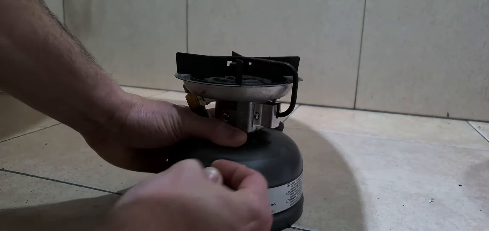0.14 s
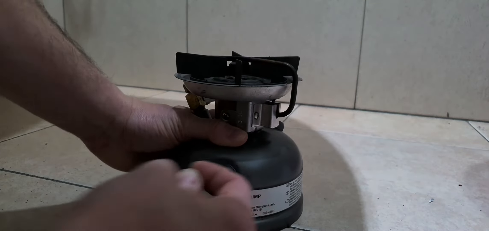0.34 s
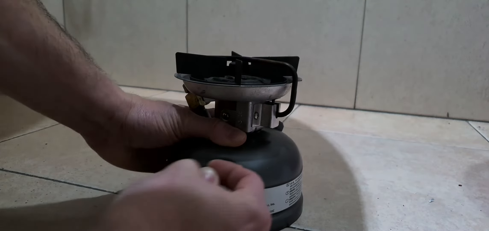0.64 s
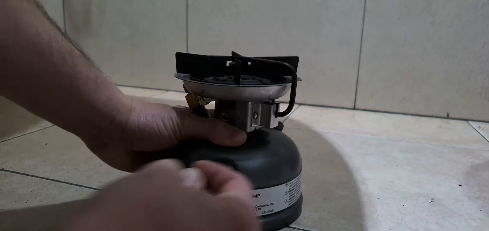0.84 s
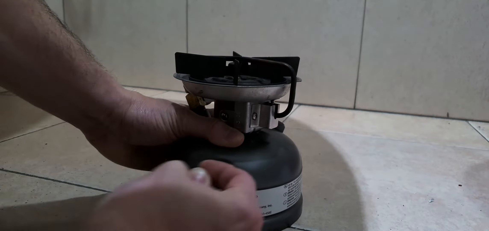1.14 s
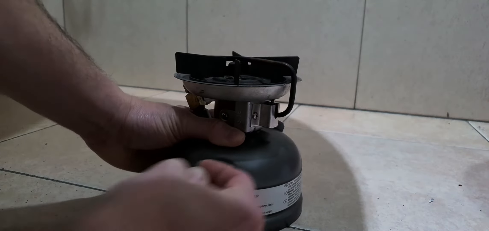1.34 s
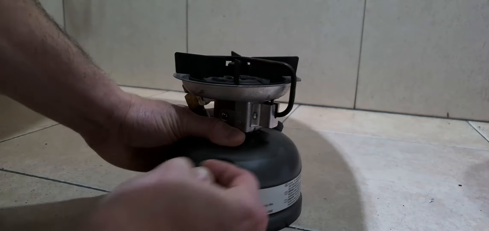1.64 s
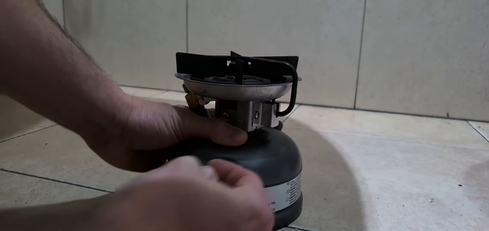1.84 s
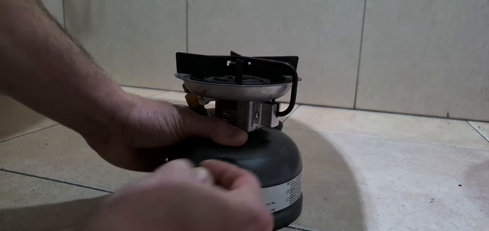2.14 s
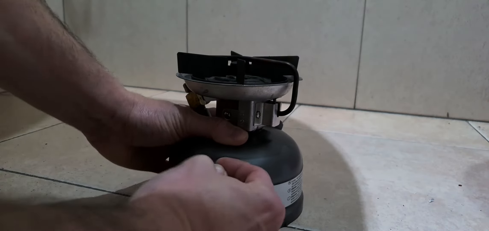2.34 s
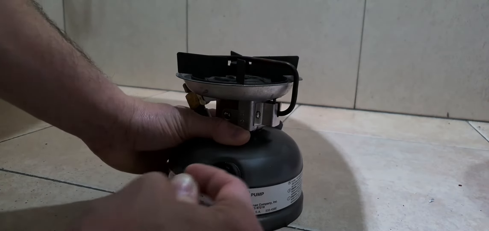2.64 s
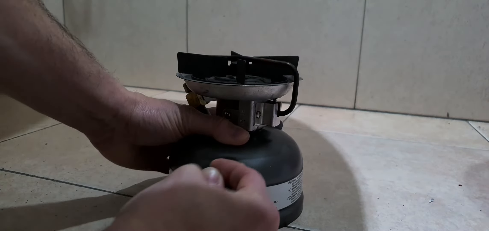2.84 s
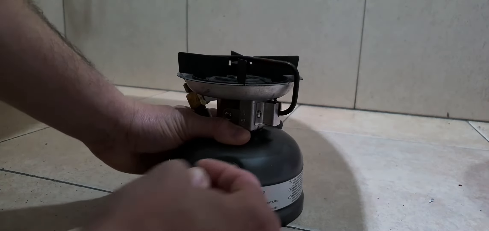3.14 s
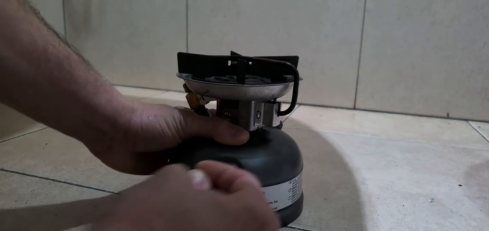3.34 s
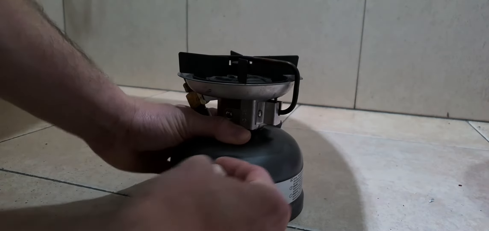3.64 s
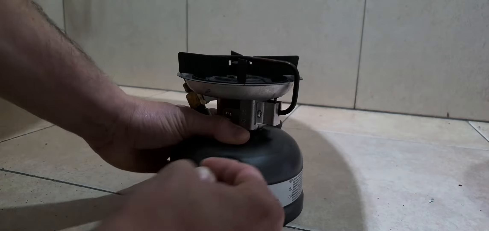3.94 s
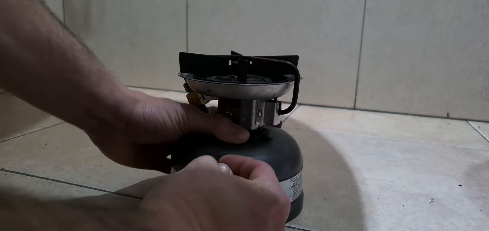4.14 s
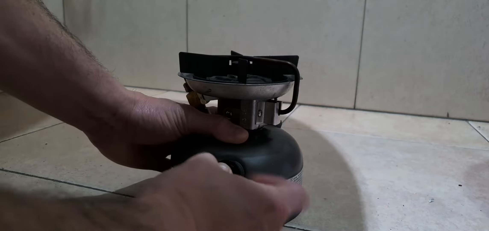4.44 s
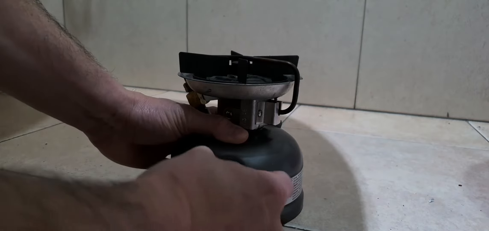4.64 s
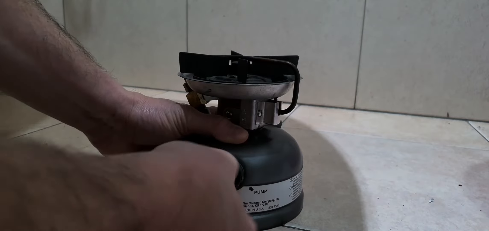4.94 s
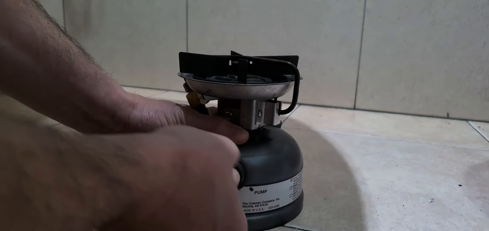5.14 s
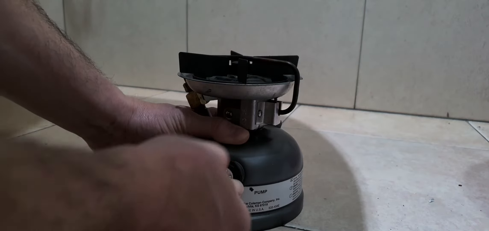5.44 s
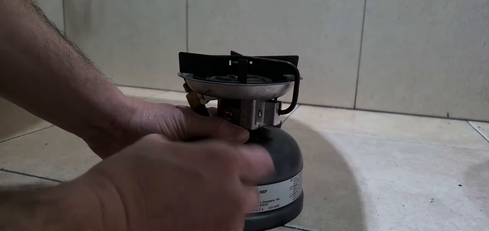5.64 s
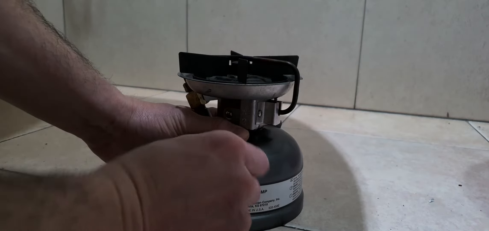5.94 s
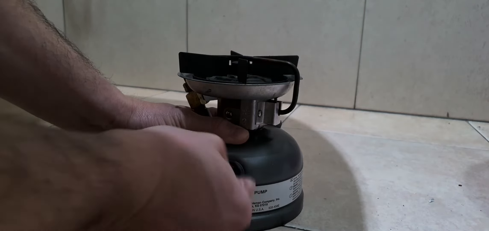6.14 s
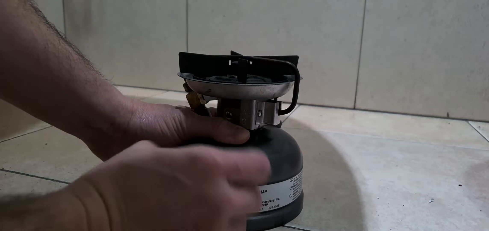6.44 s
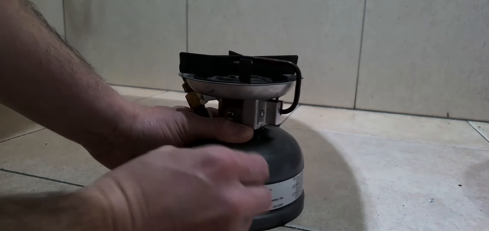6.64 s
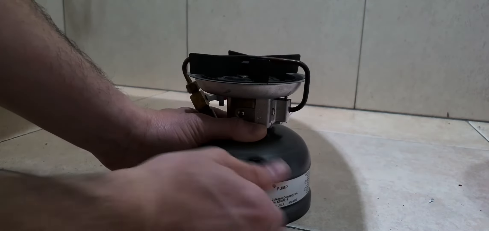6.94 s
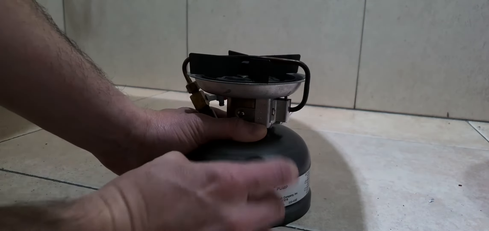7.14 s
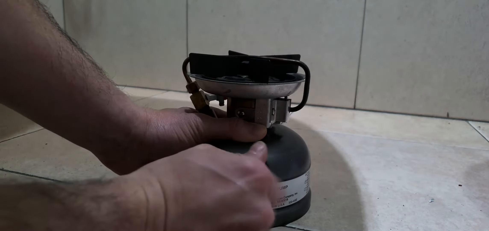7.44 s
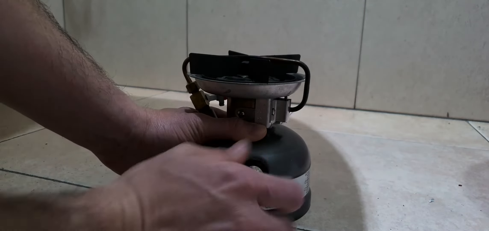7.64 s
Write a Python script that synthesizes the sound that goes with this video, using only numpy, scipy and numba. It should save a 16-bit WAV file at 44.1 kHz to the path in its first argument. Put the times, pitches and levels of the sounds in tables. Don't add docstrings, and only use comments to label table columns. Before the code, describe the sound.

Close metallic pumping on a tiled floor: gritty rod scrapes, hard clanks and rattling grate, then a short air leak, knob scrapes and final knocks.

```python
import sys
import numpy as np
from scipy import signal
from scipy.fft import rfft, irfft, next_fast_len
from scipy.io import wavfile
from scipy.ndimage import uniform_filter1d
from numba import njit

SR = 44100
rng = np.random.default_rng(int(sys.argv[2]) if len(sys.argv) > 2 else 0)


def gain_from_db(level_db):
    decades = np.asarray(level_db, float) / 20
    return 10 ** decades


def transcribe(u):
    v = np.clip(np.atleast_2d(u).T, -1, 1)
    q = np.round(v * 32767).astype(np.int16)
    wavfile.write(sys.argv[1], SR, q)


N = 343096

# start in seconds, peak in dB, brightness in dB, buzz t60 in seconds.
STROKE_ENDS = [(0.0024, -33.5, -11.5, 0.23), (0.2032, -31.5, -6, 0.23), (0.496, -30, -2.5, 0.3),
               (0.7249, -23.5, -1, 0.43), (0.9758, -26.5, -7, 0.18), (1.0047, -23, -7.5, 0.3),
               (1.2511, -24.5, -9, 0.32), (1.5367, -35.5, -13, 0.42), (1.7525, -16.5, -5.5, 0.33),
               (2.062, -21, -4, 0.19), (2.6275, -28.5, -7, 0.17), (2.9439, -15, -3.5, 0.51),
               (3.245, -24.5, -4.5, 0.51), (3.3136, -19, -4, 0.093), (3.5469, -12, -0.5, 0.45),
               (3.8248, -26, -12, 0.068), (3.8594, -27, 0.5, 0.29), (4.151, -20.5, -4, 0.49)]
# start in seconds, level in dB, swell in seconds, t60 in seconds,
# change at the top of the band in dB per octave.
RATTLES = [(0.301, -41, 0.012, 0.24, -21), (0.501, -45, 0.032, 0.43, -5), (0.727, -38.5, 0.013, 0.54, -9),
           (1.007, -48, 0.01, 0.35, -13), (1.254, -45, 0.015, 0.57, -16), (1.753, -39.5, 0.012, 0.62, -5),
           (2.065, -54.5, 0.026, 1, 2.5), (2.212, -48, 0.00057, 0.35, -5.5),
           (2.629, -48.5, 0.071, 0.38, 5.5), (2.953, -23.5, 0.0068, 0.24, 1),
           (3.316, -40.5, 0.012, 0.28, -6.5), (3.552, -19.5, 0.012, 0.26, 3),
           (3.86, -44.5, 0.026, 0.44, -15), (4.155, -26.5, 0.014, 0.28, -1), (6.872, -48, 0.0064, 0.38, -5),
           (7.285, -60.5, 0.0082, 0.3, -6)]
# start in seconds, peak in dB, #
# 60-250 Hz part in relative dB, 1.3-3.2 kHz part in relative dB.
POPS = [
    (0.336, -34, -9.5, -8),
    (0.846, -33.5, -27, -2),
    (1.099, -41.5, -36, 4.5),
    (1.378, -32, -26, -9),
    (1.89, -33.5, -14, -0.5),
    (2.365, -52, 5, -6),
    (2.439, -35.5, -26, -6),
    (3.112, -31.5, -15, -30.5),
    (3.242, -31.5, -20, 7),
    (3.682, -33, -13, -9),
]
# time in seconds, effort in dB.
EFFORT = [(0.0, -52.5), (0.37, -53), (0.63, -56.5), (0.97, -52.5), (1.61, -56.5), (2.03, -54),
          (2.24, -57.5), (2.57, -54), (2.75, -89), (2.93, -55), (2.99, -47), (3.2, -52), (3.36, -65.5),
          (3.6, -50.5), (3.97, -58), (4.16, -53.5), (4.5, -67.5), (4.65, -71.5), (4.8, -76.5), (4.93, -69),
          (5.0, -92)]
# frequency in Hz, level in dB, t60 in seconds.
TANK = [(312, 3, 0.026), (522, -6, 0.42), (688, -12.5, 0.12), (808, -2.5, 0.12), (882.4, -3.5, 0.077),
        (980, -7.5, 0.05), (1619, -4, 0.093), (1833, -2, 0.032), (2014, -5.5, 0.084), (2284, 0.5, 0.042),
        (2421, -2, 0.044), (2570, -15.5, .1), (2842, -10.5, 0.3), (3100, -13, 0.36), (3570, -6, 0.045),
        (4020, -17, 0.06), (4760, -11, 0.043), (5420, -2, 0.0078), (5800, -6.5, 0.27), (6167, -6, 0.046),
        (6850, -32, 0.056)]
# frequency in Hz, level in dB per Hz.
TANK_TONE = [(120, -48.5), (200, -2), (314, -14.5), (419, -12.5), (804, -10.5), (1150, -9), (1810, -9.5),
             (2700, -17), (3060, -13.5), (3350, -9.5), (5660, -12.5), (8120, -34), (13500, -23.5),
             (15000, -35.5)]
SPREAD_RAD = 1
MIX_SCATTER_DB = 3


def unit(x):
    return x / np.sqrt(np.mean(x ** 2))


def table(hz, rows):
    rows = np.array(rows, float)
    return np.interp(np.log(np.maximum(hz, 1)), np.log(rows[:, 0]), rows[:, 1])


def curve(rows):
    s, *columns = np.transpose(rows)
    return [np.interp(np.arange(N) / SR, s, c, left=-140, right=-140) for c in columns]


def band(x, lo_hz, hi_hz, order=3):
    return signal.sosfilt(signal.butter(order, [lo_hz, hi_hz], "band", fs=SR, output="sos"), x)


def noise(side):
    mid, other = rng.standard_normal((2, N))
    return np.array([mid + side * other, mid - side * other]) / np.sqrt(1 + side ** 2)


def colour(x, rows):
    size = next_fast_len(N)
    gain = gain_from_db(table(np.arange(size // 2 + 1) * SR / size, rows))
    return unit(irfft(rfft(x, size) * gain, size)[..., :N])


def walk(rate):
    k = int(SR / rate)
    steps = np.repeat(rng.standard_normal(N // k + 1), k)
    return unit(uniform_filter1d(uniform_filter1d(steps, k), k)[:N])


def patchy(x, lo_hz, hi_hz, rate, patchy_db, count=4):
    edges = np.geomspace(lo_hz, hi_hz, count + 1)
    return unit(sum(band(x, lo, hi, order=1) * gain_from_db(patchy_db * walk(rate)) for lo, hi in zip(edges, edges[1:])))


def bursts(s, db, t60, rise_s=.0012):
    x = np.zeros(N + SR)
    t = np.arange(SR) / SR
    for i, gain, fall in zip((s * SR).astype(int), gain_from_db(db), t60 + 0 * s):
        x[i:i + SR] += gain * (1 - np.exp(-t / rise_s)) * gain_from_db(-60 * t / fall)
    return x[:N]


@njit
def resonate(start, size, pole, turn):
    out = np.zeros((2, N))
    for m in range(len(pole)):
        z, k = 0j, 0
        for i in range(start[0], N):
            z *= pole[m]
            while k < len(start) and start[k] == i:
                z += size[k, m] + 1e-15
                k += 1
            out[0, i] += (z * turn[m]).imag
            out[1, i] += (z * np.conj(turn[m])).imag
    return out


def ring(s, size, hz, t60):
    order = np.argsort(s)
    turn = np.exp(1j * SPREAD_RAD * np.minimum(hz / 1500, 1) * (2 * rng.random(len(hz)) - 1))
    pole = np.exp(2j * np.pi * hz / SR - np.log(1000) / (t60 * SR))
    return resonate((s[order] * SR).astype(np.int64), size[order], pole, turn)


def steel():
    x = noise(0.91)
    bunched = sum(gain_from_db(db) * band(x, hz * .984, hz * 1.016, order=1) for hz, db, _ in TANK)
    return unit(bunched) + .5 * colour(noise(.7), TANK_TONE)


def blows():
    # start in seconds,
    # peak in dB, brightness in dB, buzz t60 in seconds.
    ticks = [(0.1067, -60, -16, 0.54), (0.23, -39, 7.5, 0.12), (0.297, -43, 6, 0.35), (1.6702, -50, 9.5, 1),
             (2.2128, -39.5, 2, 0.64), (2.3101, -39.5, -31, 0.068), (2.6665, -36, -4.5, 0.86),
             (4.449, -52.5, -2, 0.29), (0.1476, -55, 5, .1), (0.511, -31, -5, 0.099), (1.3129, -50, 0, .1),
             (1.3259, -40, 2.5, 0.14), (1.5582, -43.5, 5, 0.3), (2.107, -35.5, -14, 0.33),
             (2.1999, -53, 4, .08), (2.3915, -50, 2, .1), (2.96, -36, 18, 0.065), (3.5622, -28, 12, 0.16),
             (4.1591, -38, 14, 0.08), (4.1788, -27.5, 7, .12), (3.574, -23, 5, .1)]
    # start in seconds, peak in dB, brightness in dB,
    # body in dB, buzz t60 in seconds.
    knob = [(4.9435, -39.5, 0, -21, 0.44), (5.142, -22, -5, -9, 0.12), (5.3694, -45.5, -17, -16.5, 0.33),
            (5.5056, -52.5, -13, -13, 0.37), (5.7012, -48.5, -13, -0.5, 0.35),
            (5.8755, -61.5, -24, -5, 0.4), (6.027, -69, -11, 10, 0.65), (6.1596, -46, -21, -3, 0.38),
            (6.511, -50, -36, -4, 0.55), (6.594, -40, -25, -9.5, 0.74), (6.7615, -57, 0, 9, 0.83),
            (6.817, -57, 2, -4, .5), (5.78, -62.5, -15.5, -11, .2), (6.8698, -19, -7.5, -11.5, 0.22),
            (6.894, -21.5, -8.5, -11, 0.22), (7.216, -44, -13, -7, 0.78), (7.2825, -28.5, -9, -12.5, 0.36),
            (7.4664, -28.5, -11, -6.5, 0.28)]
    rod_top_db, knob_top_db, top_per_db = -11.5, -11, 1.12
    rows = []
    for s, db, high, buzz in STROKE_ENDS:
        body_db = -10.5 - 0.36 * (db + 24.0)
        rows.append((s, db, body_db, high, rod_top_db + top_per_db * high, buzz))
    for s, db, high, buzz in ticks:
        rows.append((s, db, -11.5, high, rod_top_db + top_per_db * high, buzz))
    for s, db, high, low, buzz in knob:
        rows.append((s, db, low, high, knob_top_db + top_per_db * high, buzz))
    return np.transpose(sorted(rows))


def landing():
    s, db, high = np.transpose(STROKE_ENDS)[:3]
    lead_s = 0.0094
    drag = unit(band(noise(0.71), 900, 3000)) * bursts(np.maximum(s - lead_s, 0), db - 22, .08, 0.0047)
    return drag + unit(band(noise(0.74), 6500, 17000)) * bursts(s, db + high - 10.5, .015, .0005)


def knocks(count=5):
    # lower edge in Hz, upper edge in Hz.
    bands_hz = [(200, 1200), (1300, 3200), (3500, 8000), (8000, 15500)]
    s, db, low, high, top, buzz_s = blows()
    s = s - .0006
    hz, mode_db, t60 = np.transpose(TANK)
    rel = np.array([low, 0 * db, high, top])
    mix_db = db[:, None] + rel[np.searchsorted([1250, 3350], hz)].T + mode_db - 17.5
    mix_db += MIX_SCATTER_DB * rng.standard_normal(mix_db.shape)
    late = .004 * rng.random((len(s), count)) * (np.arange(count) > 0)
    strength = rng.standard_normal((late.size, len(hz)))
    strength[::count] = 1.2 * np.sign(strength[::count])
    size = gain_from_db(np.repeat(mix_db, count, axis=0)) * strength
    damped_s = np.minimum(.68 * t60, .08)
    out = ring((s[:, None] + late).ravel(), size, hz, damped_s)
    wall = steel()
    cracks_db, buzzes_db = (-6.0, -6.0, -13.0, -6.5), (-8.0, -18.5, -20.5, -12.5)
    for (lo, hi), r, crack_db, buzz_db in zip(bands_hz, rel, cracks_db, buzzes_db):
        crack = bursts(s, db + r + crack_db, 0.018, 0.0016)
        buzz = bursts(s, db + r + buzz_db, buzz_s, 0.0025)
        out += unit(band(wall, lo, hi, order=5)) * (crack + buzz)
    return out


def thumps():
    s, db = np.transpose(RATTLES)[:2]
    rock = ring(s - .004, gain_from_db(.5 * db - 28.5)[:, None] * np.ones(2), np.array([46., 64]), np.array([.2, .25]))
    s, db, low = blows()[:3]
    thud_size = gain_from_db(0.48 * (db + low) - 35.5)[:, None] * np.ones(2)
    thud = ring(s + 0.013, thud_size, np.array([118., 136]), np.array([.2, .15]))
    return band(rock, 36, 300, order=2) * gain_from_db(np.array([[5], [-8]])) + thud


def floor():
    # time in seconds, level in dB.
    lean = [(0.0, -58), (0.59, -48), (0.69, -56.5), (1.03, -48.5), (1.14, -57), (1.27, -46), (1.76, -55),
            (1.8, -47.5), (2.4, -62.5), (2.47, -49.5), (2.9, -62.5), (2.95, -47.5), (3.07, -55),
            (3.15, -49), (3.46, -62), (3.56, -48), (4.03, -55), (4.18, -49), (4.26, -53.5), (4.6, -49),
            (4.66, -55.5), (4.95, -54)]
    # time in seconds, level in dB.
    squeeze = [(4.95, -52), (5.06, -61), (5.21, -54), (5.35, -69), (5.5, -60.5), (5.58, -70), (5.73, -56.5),
               (5.84, -70.5), (6.05, -60.5), (6.12, -67), (6.28, -57), (6.37, -58), (6.43, -70),
               (6.5, -57.5), (6.72, -67), (6.92, -52), (6.98, -63), (7.54, -60), (7.6, -67.5), (7.78, -63)]
    # frequency in Hz, level in dB per Hz.
    rumble_tone = [(59, -29), (100, 6), (167, -7), (268, 1), (328, -13), (388, -10), (411, -37), (481, -6),
                   (560, -14), (730, -47), (1230, -120)]
    wobble_db = np.maximum(curve(lean)[0], curve(squeeze)[0])
    effort_db, = curve(EFFORT)
    rumble_db = -6 - 55 + 1.2 * (wobble_db + 54.5) + 0.32 * (np.maximum(effort_db, -72) + 54.5)
    pop_s, pop_db = np.transpose(POPS)[:2]
    rumble = gain_from_db(rumble_db) + bursts(pop_s, pop_db - 27.5, .5, 0.016)
    phase = 2 * np.pi * np.cumsum(70 + 4 * walk(7)) / SR
    wobble = gain_from_db(3 * walk(11)) * np.sin(phase)
    wobble = wobble + .8 * unit(band(noise(.5), 61, 79, order=2)) + .15 * unit(band(noise(3), 28, 60))
    out = unit(wobble) * gain_from_db(wobble_db + np.array([[.6], [-.6]]))
    return out + colour(noise(.3), rumble_tone) * rumble * gain_from_db(2.5 * walk(20))


def grains():
    return steel() * gain_from_db(1.5 * walk(200) + 2.2 * np.maximum(walk(700) - 1, 0))


def pauses():
    t = np.arange(N) / SR
    s = blows()[0]
    ahead = s[np.minimum(np.searchsorted(s, t), len(s) - 1)] - t
    return gain_from_db(-11 * np.exp(-np.abs(ahead) / .04) * (t < 4.2))


def scrape():
    grit, rest = grains(), pauses()
    effort_db, = curve(EFFORT)
    shake_s, shake_db = np.transpose(RATTLES)[:2]
    shake = bursts(shake_s, -35 + 3 * shake_db, 0.4, 0.03)
    treble = gain_from_db(-61 + 2.5 * (effort_db + 55.0)) + shake
    hiss = gain_from_db(-59 + 1.55 * (effort_db + 54.0))
    out = unit(band(grit, 550, 3100, order=5)) * gain_from_db(effort_db) * rest ** 0.49 * gain_from_db(2.0 * walk(27))
    bright = patchy(band(grit, 3500, 8000), 3500, 8000, 22, 1.8)
    out += bright * treble * rest * gain_from_db(3 * walk(25) + 1.5 * walk(90))
    fine = band(noise(1), 8000, 15200) * gain_from_db(3 * np.maximum(walk(900) - 1, 0))
    fine = patchy(fine, 8000, 15500, 22, 1.8)
    return out + fine * hiss * rest * gain_from_db(2.2 * walk(18) + 2 * walk(150))


def slides():
    # start in seconds, length in seconds, level in dB, centre in Hz.
    rubs = [(0.1, .08, -58, 2420), (0.146, .04, -57, 4000), (0.22, .02, -51.5, 4770),
            (0.296, .1, -57, 4300), (0.467, .02, -56, 2400), (.93, .04, -54, 2500),
            (1.266, .08, -55.5, 4380), (1.385, .12, -62, 4470), (1.897, .05, -55, 2440),
            (2.213, .07, -58, 4080), (2.444, .14, -57, 2400), (2.69, .06, -57, 5400),
            (2.734, .015, -52.5, 2350), (4.36, 0.26, -66.5, 706), (6.603, .16, -72.5, 5700),
            (6.757, .105, -61, 4296), (6.75, .115, -64, 1900), (6.471, .1, -64, 214),
            (0.513, 0.073, -55, 2900)]
    edge_s, t60_s, width = .004, .1, 1.22
    out = np.zeros((2, N))
    grit = steel() * gain_from_db(2.0 * walk(300) + 2.5 * np.maximum(walk(900) - 1, 0) + 0.7 * walk(40))
    for start, length, db, hz in rubs:
        i, t = int(start * SR), np.arange(int((length + .2) * SR)) / SR
        shape = np.minimum(t / edge_s, 1) * gain_from_db(db - 60 * np.maximum(t - length, 0) / t60_s)
        out[:, i:i + len(t)] += shape * unit(band(grit[:, i:i + len(t)], hz / width, hz * width, order=2))
    return out


def singing():
    # start in seconds,
    # frequency in Hz, level in dB, t60 in seconds, beat in Hz.
    rings = [(.11, 4050, -61, 1.5, 40), (.235, 4050, -59, .8, 40), (.73, 4440, -45, .35, 50),
             (1.01, 5750, -45, .3, 24), (1.78, 3120, -58, 1.5, 6), (2.065, 5750, -49, .4, 18),
             (2.96, 6094, -30.5, .6, 4), (2.96, 4310, -39.5, .6, 12), (2.97, 12015, -33, .13, 20),
             (2.975, 7967, -36.5, .85, 1), (3.123, 312, -60, .23, 4), (3.316, 5780, -42, .17, 22),
             (3.56, 4310, -31.5, .44, 24), (3.57, 7015, -23, .12, 12), (3.58, 9938, -43, .6, 12),
             (3.6, 3135, -56, 1., 12), (4.155, 2563, -44, .85, 0), (4.165, 2562, -62.5, 5, 0),
             (4.1652, 2564.5, -64, 5, 0), (4.17, 6090, -44, .55, 7), (4.172, 4470, -48, 1., 94.5),
             (5.143, 1590, -44, .28, 30), (1.382, 3140, -59, .5, 35), (6.597, 2290, -49, .22, 30),
             (6.597, 802, -56, .6, 30), (6.871, 775, -40, .3, 20), (6.893, 1812, -36, .2, 15),
             (6.893, 3138, -48, .25, 30), (6.871, 3634, -42, .19, 25), (4.153, 2369, -32, .2, 30),
             (1.754, 1580, -36, .15, 25), (6.03, 1610, -69, .5, 45),
             (7.283, 845, -45.5, 0.19, 14), (7.283, 3138, -53.5, .26, 30), (7.29, 1300, -53, .3, 35),
                   (7.282, 2420, -43, 0.091, 25), (6.8, 1626, -44, .13, 32), (7.467, 1782, -45, 0.16, 30),
                   (7.467, 3575, -59, .26, 22), (7.467, 2600, -62, .22, 30), (7.467, 340, -54, .2, 8),
                   (4.45, 1800, -59, .08, 9.2), (2.96, 2565, -50, .9, 5), (2.95, 312, -43.5, 0.46, 6),
                   (.728, 810, -37.5, .08, 12), (2.062, 2600, -35, 0.042, 20), (6.15, 1640, -57, .2, 25),
                   (5.7, 485, -62, 0.29, 8), (.203, 830, -40, .07, 10), (6.597, 3140, -66, 0.36, 25),
                   (3.245, 2460, -34, .04, 20), (3.313, 2390, -31, .04, 20), (3.825, 2460, -38, .04, 20),
                   (3.862, 5800, -45, .14, 20), (3.246, 720, -36, .04, 20)]
    grasp_s, grate_rests_s = 4.91, 4.6
    out, buzz = np.zeros((2, N)), rng.standard_normal(N)
    touches = np.r_[np.transpose(STROKE_ENDS)[0], grasp_s]
    for start, hz, db, t60, beat_hz in rings:
        stop = min(touches[touches > start], default=start + t60)
        if hz > 4000 and start < grate_rests_s:
            stop = min(stop, grate_rests_s)
        i = int(start * SR)
        t = np.arange(int((min(stop + 0.12, N / SR) - start) * SR) - 1) / SR
        shape = np.minimum(t / .004, 1) * gain_from_db(db - 60 * t / t60 - 600 * np.maximum(t - stop + start, 0))
        shape *= 1 + min(.5 + beat_hz / 70, .9) * np.sin(2 * np.pi * beat_hz * t)
        jitter = np.cumsum(buzz[i:i + len(t)]) * (abs(beat_hz) / 250) ** 1.5
        spread = SPREAD_RAD * np.clip(abs(rng.standard_normal()), .3, 1) * min(beat_hz, 1)
        phase = 2 * np.pi * hz * t + jitter - spread * np.array([[.5], [-.5]])
        out[:, i:i + len(t)] += shape * np.sin(phase)
    return out


def rattles(count=300, dense=64):
    # frequency in Hz, t60 in seconds, level in dB at the first, second and
    grate = [(2368, .12, -35, -33.5, -23.5), (4320, .12, -32, -22.5, -32), (4440, .1, -29, -26.5, -27),
             (5000, .12, -30, -30, -34.5), (5160, .12, -45, -23.5, -33), (5537, .1, -39, -25.5, -33),
             (6100, .1, -11, -33.5, -30), (8877, .07, -27, -14, -33), (9405, .1, -23, -24.5, -32.5),
             (9940, .1, -23, -30, -33.5), (11350, .08, -34, -27.5, -41), (12020, .08, -20.5, -31, -33),
             (12800, .07, -26, -23.5, -28.5), (13090, .08, -16, -35.5, -35), (13500, .08, -34, -32, -29),
             (14200, .1, -29, -34.5, -31.5)]
    # frequency in Hz, level in dB per Hz.
    rattle_tone = [(120, -42), (200, -12.5), (1770, -8.5), (2650, -8), (4200, 3), (7410, -9.5), (9230, -3),
                   (14300, -17.5), (16000, -97)]
    start, db, swell, t60, top_db = np.transpose(RATTLES)[:, :, None]
    chance = rng.uniform(size=(3, len(RATTLES), count))
    age = 0.19 * chance[0] ** 1.6
    swell_db = 20 * np.log10(1 - np.exp(-(age / swell) ** 2) + 1e-3)
    tick_db = (db + swell_db - 60 * age / t60 - 1.5 * np.log(chance[1])).ravel()
    s, top_db = (start + age).ravel(), np.repeat(top_db, count)
    hz, mode_t60, *hard_db = np.transpose(grate)
    bar_db = -41.5 + np.zeros((len(RATTLES), len(hz)))
    bar_db[db[:, 0] > -32] = np.add(hard_db, 2.5)
    pan_hz = np.sort(np.linspace(700, 15100, dense) + 200 * rng.random(dense))
    pan_db = np.outer(top_db, np.log2(np.maximum(pan_hz / 4000, 1))) + table(pan_hz, rattle_tone) - 14
    mode_db = np.c_[np.repeat(bar_db, count, axis=0), pan_db]
    hz, mode_t60 = np.r_[hz, pan_hz], np.r_[1.25 * mode_t60, .022 + 0 * pan_hz]
    size = gain_from_db(tick_db[:, None] + mode_db) * rng.standard_normal((len(s), len(hz)))
    return ring(s, size, hz, mode_t60)


def pops():
    s, db, low, high = np.transpose(POPS)
    hz = np.array([73.5, 142, 233, 335, 566, 814, 1010, 2320, 895])
    t60 = np.array([.3, .15, .07, .07, .03, 0.03, .025, .03, .006])
    flat = 0 * s
    rel = np.array([low, low - 5, low - 5, flat - 6, flat - 8, flat - 4, flat - 7, high - 4, flat - 2.5])
    mix_db = db[:, None] + rel.T
    size = gain_from_db(mix_db + MIX_SCATTER_DB * rng.standard_normal(mix_db.shape)) * (-1) ** np.arange(len(hz))
    modes = ring(np.r_[s, s + .004], np.r_[.25 * size, size], hz, t60)
    puff = bursts(s, db - 3.0, 0.022, 0.008) + bursts(s, db - 18.0, 0.17)
    puff += bursts(s + 0.0024, db - 2.0, 0.0051, 0.00059)
    return modes + unit(band(noise(0.3), 150, 1200)) * puff


def air():
    # time in seconds, level in dB.
    brush = [
        (4.79, -87),
        (4.84, -71),
        (4.9, -66),
        (4.94, -79),
        (5.0, -90),
    ]
    # time in seconds, level in dB.
    release = [
        (4.78, -100),
        (4.856, -68),
        (5.024, -77),
        (5.072, -42),
        (5.11, -45),
        (5.158, -44.5),
        (5.3, -91.5),
    ]
    # frequency in Hz, level in dB per Hz.
    air_tone = [(180, -10), (300, -4), (603, -3), (801, -4.5), (1510, 2), (3830, -1.5), (12500, 7),
                (16000, -2)]
    leak = patchy(colour(noise(0.9), air_tone), 150, 17000, 60, 1.2, count=9) * gain_from_db(1.5 * walk(150))
    brushing = unit(band(noise(0.83), 8000, 12500, order=2))
    return leak * gain_from_db(curve(release)[0] + 7.0) + brushing * gain_from_db(curve(brush)[0])


def twists():
    # peak time in seconds, swell in seconds, level in dB,
    # treble in relative dB, groan in relative dB.
    turns = [
        (5.355, 0.031, -56, -8.5, -25.5),
        (5.698, 0.014, -53, -14, -13),
        (6.05, 0.073, -74.5, 4, 0),
        (6.13, 0.1, -68.5, 5, -5),
        (6.17, 0.058, -50.5, -23, -27),
        (6.53, 0.023, -89.5, -21.5, -1.5),
        (6.859, 0.45, -61.5, 4, 13),
    ]
    peak, swell, db, treble_db, groan_db = np.transpose(turns)[:, :, None]
    age = np.arange(N) / SR - peak
    shape = gain_from_db(db + np.where(age < 0, 42 * age / swell, -60 * age / .3)) * (age > -swell)
    treble, groan = (shape * gain_from_db(treble_db)).sum(axis=0), (shape * gain_from_db(groan_db)).sum(axis=0)
    grit = grains()
    out = unit(band(grit, 1350, 2900, order=5)) * shape.sum(axis=0) * gain_from_db(1.5 * walk(40))
    out += unit(band(grit, 5600, 14000)) * treble * gain_from_db(1.0 * walk(45))
    return out + unit(band(noise(.6), 560, 920)) * groan * gain_from_db(.8 * walk(60))


def room(x):
    # frequency in Hz, t60 in seconds.
    room_t60 = [(200, 0.35), (2000, 0.24), (14000, 0.028)]
    wet_db = -6.5
    t = np.arange(int(.6 * SR)) / SR
    tail = 0
    for hz in 125 * 2 ** np.arange(7.):
        octave = band(rng.standard_normal((2, len(t))), hz / 1.41, hz * 1.44)
        tail = tail + octave * gain_from_db(-60 * t / table(hz, room_t60))
    tail *= np.minimum(t / 0.0032, 1)
    tail /= np.sqrt(np.sum(tail ** 2, axis=1, keepdims=True))
    return gain_from_db(wet_db) * signal.fftconvolve(x.mean(axis=0, keepdims=True), tail, axes=1)[:, :N]


def scene():
    near = landing() + knocks() + slides() + singing() + rattles() + pops() + air()
    handling = thumps() + floor() + scrape() + twists()
    quiet = colour(noise(.8), TANK_TONE) + 0.5 * unit(band(noise(0.91), 9800, 13000))
    return near + room(near) + handling + gain_from_db(-87.5) * quiet


def band_limit(x):
    return signal.sosfilt(signal.butter(12, 16650, fs=SR, output="sos"), x)


def record(dry):
    # frequency in Hz, level in dB.
    left_db = [(30, 3.5), (70, 1), (250, -0.3), (600, 0.5), (2000, 0.5), (5000, 2), (8000, -2),
               (14000, -0.5)]
    left_lead, side_hz, top_hz = 1.9, 300, 15300
    mid, side = (dry[0] + dry[1]) / 2, (dry[0] - dry[1]) / 2
    side = 0.52 * side + 0.45 * signal.lfilter(*signal.butter(2, side_hz, "high", fs=SR), side)
    size = next_fast_len(N)
    bins = np.arange(size // 2 + 1)
    turn = np.minimum(2 * np.pi * bins * left_lead / size, 1.2)
    tilt = gain_from_db(table(bins * SR / size, left_db))
    left = irfft(rfft(mid + side, size) * tilt * np.exp(1j * turn), size)[:N]
    x = np.array([left, mid - side])
    x = signal.sosfilt(signal.cheby2(12, 32, top_hz * 1.035, fs=SR, output="sos"), x)
    return band_limit(x)


dry = scene()
out = record(dry)
transcribe(out)
```